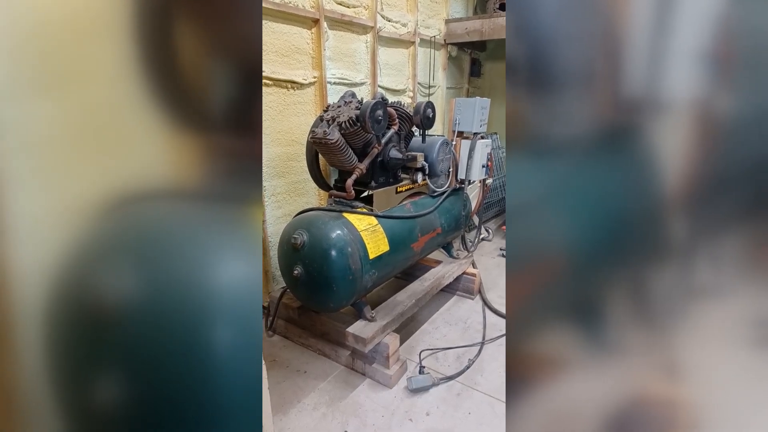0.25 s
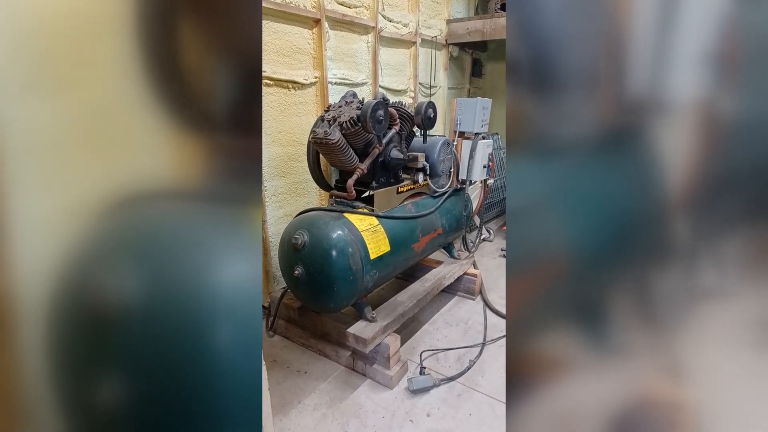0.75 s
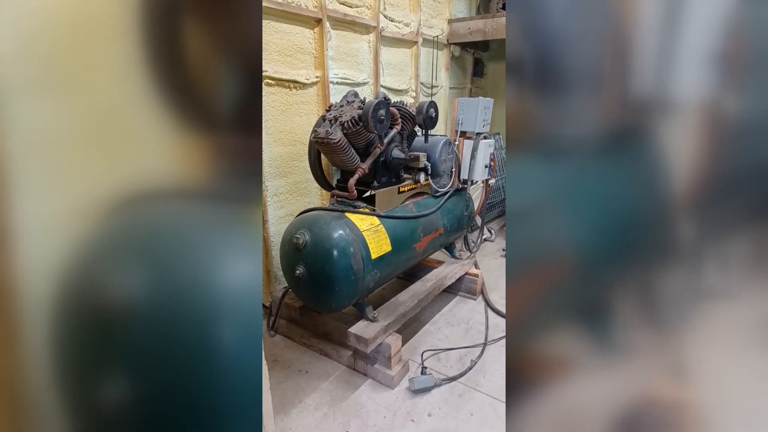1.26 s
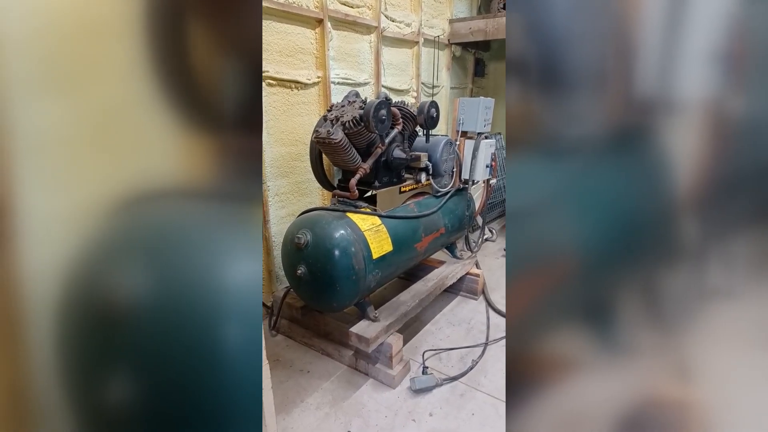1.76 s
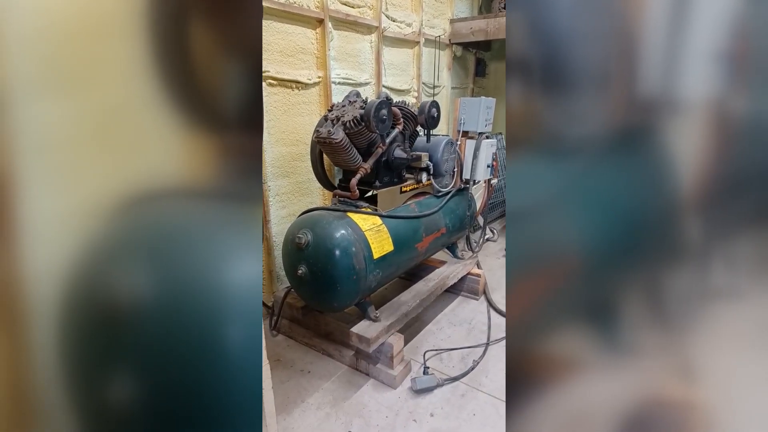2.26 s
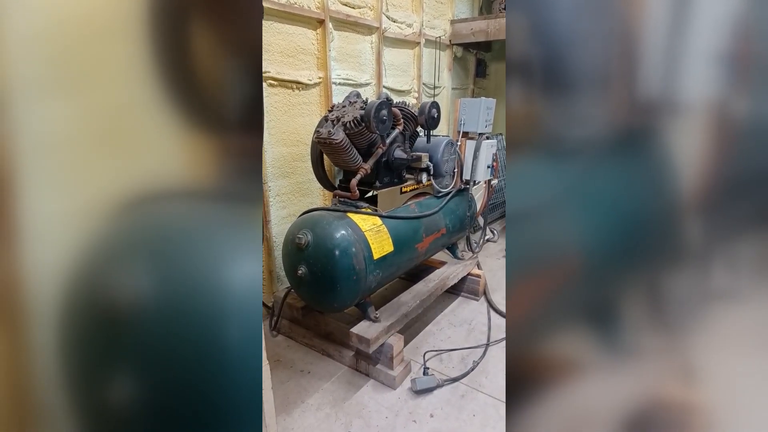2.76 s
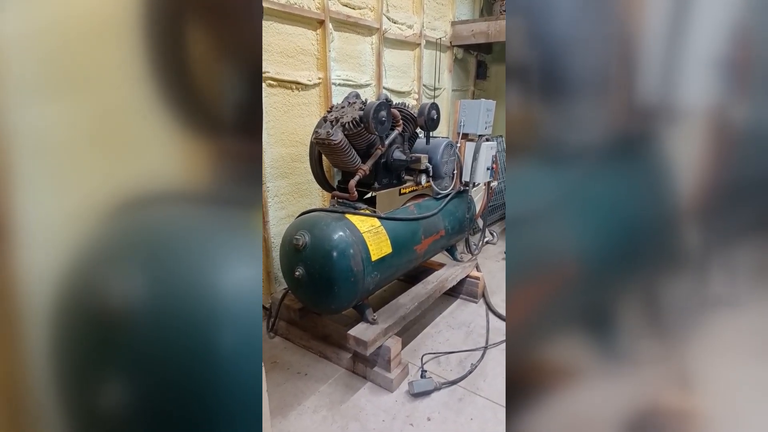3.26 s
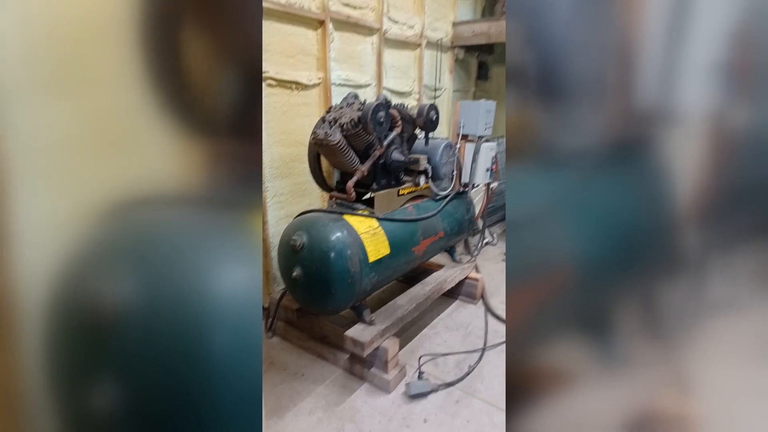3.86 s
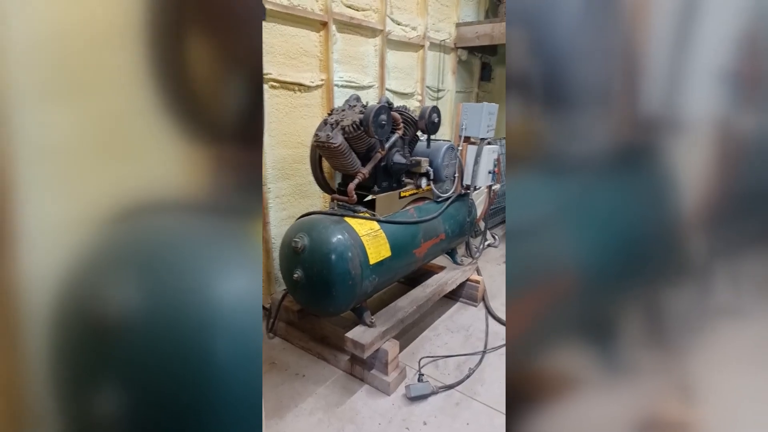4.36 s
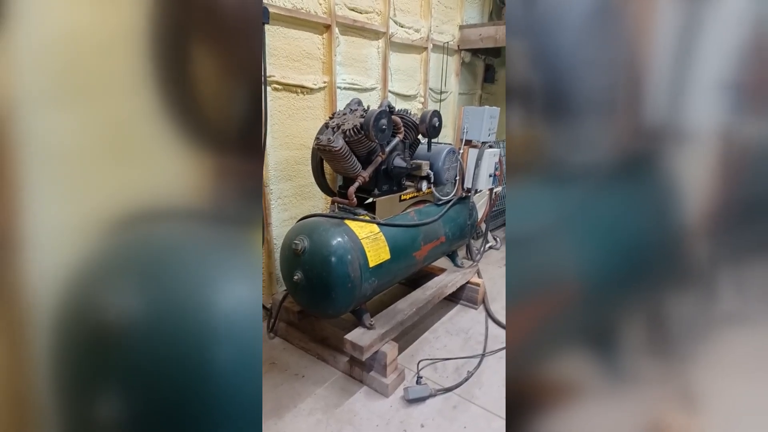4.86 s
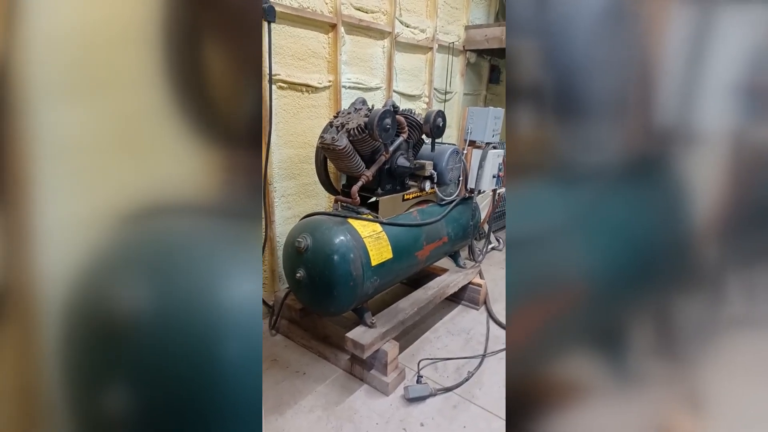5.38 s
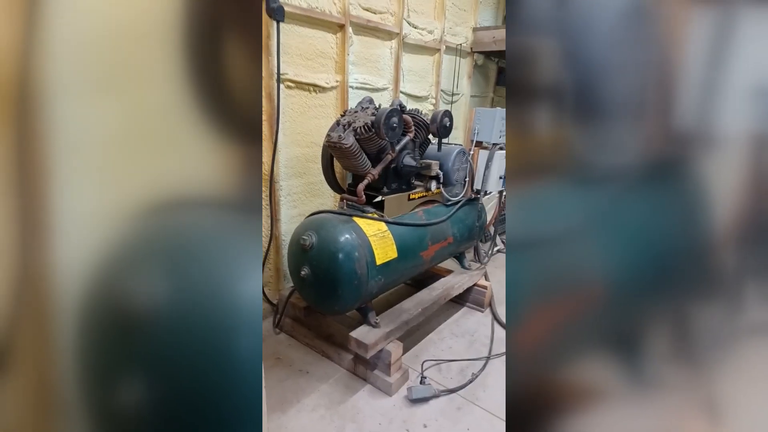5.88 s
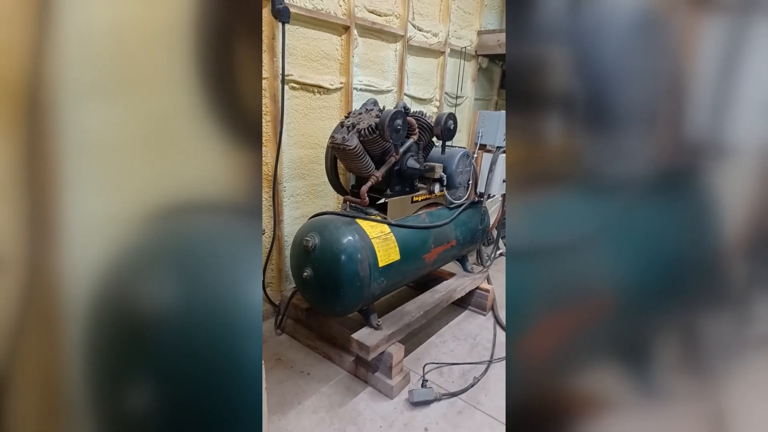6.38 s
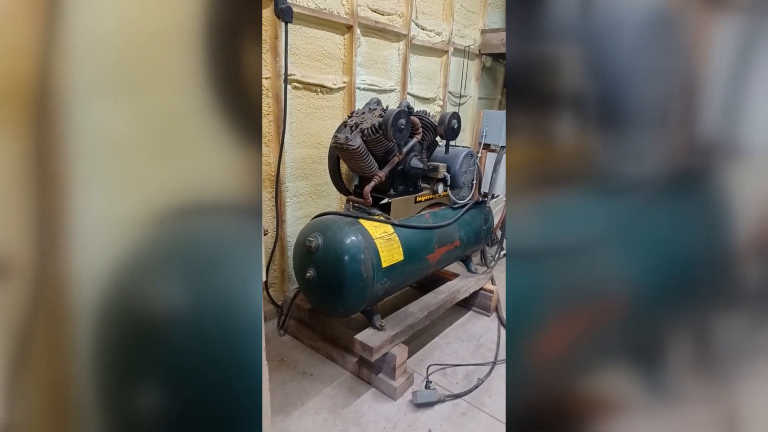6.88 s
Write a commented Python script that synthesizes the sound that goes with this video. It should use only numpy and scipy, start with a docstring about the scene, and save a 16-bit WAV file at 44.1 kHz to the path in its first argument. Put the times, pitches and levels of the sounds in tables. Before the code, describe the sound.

An electric air compressor runs without pause, its fast, regular chugging mixed with airy hiss, light metal clatter and a low hum.

```python
"""A belt-driven two-cylinder air compressor chugs steadily on its tank in a small workshop.
Every turn of the crank repeats the same puffs of air, which ring the tank and the room, and the same
valve gushes, rod knock and clatter, which ring the metalwork. The electric motor hums under the
pulsing load, over a bed of tank rumble and fan rush. Near walls echo the treble, which wavers as
the microphone moves."""
import sys
import numpy as np
from scipy import signal
from scipy.fft import rfft, irfft, next_fast_len
from scipy.io import wavfile

SR = 44100
rng = np.random.default_rng(int(sys.argv[2]) if len(sys.argv) > 2 else 0)


def wrap_up_sound(samples):
    """Save the sound to the file named by the first command line argument, as 16-bit audio."""
    columns = np.atleast_2d(samples).T
    # keep every value between -1 and 1, then stretch to whole-number steps
    tamed = np.clip(columns, -1, 1)
    steps = np.round(tamed * 32767).astype(np.int16)
    wavfile.write(sys.argv[1], SR, steps)


N = 314433
TIME = np.arange(N) / SR
TURNS_PER_S, SLOWING_PER_S = 9.5012, 0.00125   # the crank slows a little as the tank fills


# The chug, pressure puffs within one turn: start_s, level_db, pitch_hz, width_hz
AIR_PUFFS = [(0.0114, -41.0, 670, 198), (0.02, -24.8, 197, 68), (0.0336, -32.9, 242, 79),
             (0.0401, -41.9, 418, 96), (0.0477, -29.7, 127, 169), (0.0636, -29.3, 180, 129),
             (0.0891, -38.5, 355, 80), (0.0982, -23.0, 226, 99)]
# The boom of tank, pipes and room: pitch_hz, width_hz, gain_db
TANK_MODES = [(75.7, 15.4, 2.0), (97.7, 5.0, 8.4), (139.1, 20.7, -1.8), (147.9, 5.0, 12.3),
              (183.9, 5.0, 0.3), (221.0, 5.0, 2.8), (260.2, 5.0, 12.5), (306.1, 5.0, 15.0),
              (358.1, 5.6, 21.0), (377.8, 7.3, 21.8), (412.5, 8.6, 6.4), (477.7, 7.8, 15.3),
              (601.8, 7.5, 20.4), (653.8, 24.1, 7.3)]
def pumping(turns, wall_s=0.00617):
    """The puffs set tank and room ringing; a reflection from the side wall widens them."""
    puffs = strokes(turns, AIR_PUFFS, uneven_db=-0.28, loose_s=.00002)
    return widen_by_echo(ringing(puffs, TANK_MODES), wall_s)


# Each valve's hiss, by valve name: pitch_hz, width_hz, level_db, left_minus_right_db
HISS_BANDS = { "first outlet": [(6800, 510, -34.5, 1.5), (7540, 500, -36, 7.5), (10260, 490, -39.5, -2),
              (12800, 640, -33.5, -4), (13500, 2200, -30, -4)], "second outlet": [(1320, 870, -42, -7),
              (2230, 1230, -39, -1.5), (7490, 380, -39.5, 4.5), (13100, 880, -34.7, -7.5),
              (14500, 1100, -40, 4)], "first inlet": [(5690, 1070, -35.5, -2.5)],
              "second inlet": [(5950, 380, -41.5, 2), (7635, 560, -39, 8), (9550, 1000, -39, 1.5)]}
# Valve cues within one turn: valve, start_s, rise_s, hold_s, decay_s
VALVE_CUES = [("first outlet", 0.0956, .0013, .004, 0.014), ("second outlet", .018, .004, 0.014, .013),
              ("first inlet", 0.031, 0.0055, 0.011, .017), ("second inlet", 0.0675, .002, 0.0064, 0.012)]
def valves(turns, uneven_db=0.8, flutter_db=1.33):
    """Each valve opens at its crank angle and sings in bands of its own while the air passes."""
    out = np.zeros((2, N))
    for valve, start_s, rise_s, hold_s, decay_s in VALVE_CUES:
        open_s = (turns / TURNS_PER_S - start_s) % (1 / TURNS_PER_S)
        for hz, width_hz, db, pan_db in HISS_BANDS[valve]:
            late_s = 0.7 / width_hz   # a narrow band builds up and dies away later
            flow = gush(open_s, rise_s + late_s, hold_s + late_s, decay_s + late_s)
            level = from_db(db + uneven_db * drift(10) + flutter_db * drift(130))
            pan = from_db([[pan_db / 2], [-pan_db / 2]])
            out += jet(hz, width_hz) * flow * level * pan
    return out


def gush(open_s, rise_s, hold_s, decay_s):
    """Air flow through a valve rises, holds and dies away; its peak is 1."""
    flow = (1 - np.exp(-open_s / rise_s)) * np.exp(-np.maximum(open_s - hold_s, 0) / decay_s)
    return flow / flow.max()


def jet(hz, width_hz, direct_share=0.17, lag_s=.0003):
    """A band of air noise: the direct share arrives left just before right, the rest is diffuse."""
    noise = white((3, N))
    direct = np.array([noise[2], np.roll(noise[2], int(lag_s * SR))])
    air = np.sqrt(1 - direct_share) * noise[:2] + np.sqrt(direct_share) * direct
    edges_hz = np.clip([hz - width_hz / 2, hz + width_hz / 2], 50, .45 * SR)
    return signal.sosfilt(butter(2, edges_hz, "band"), air) / np.sqrt(width_hz)


# Wrist pin and rod knock at the top of the hard stroke, then rebound: start_s, level_db
ROD_HITS = [(.021, -40), (.025, -40), (.034, -48.5)]
# The rod's clank: pitch_hz, width_hz, gain_db
ROD_MODES = [(765, 350, -5), (1103, 260, -1.5), (1480, 420, -3), (2180, 550, -5.5)]
def rod_knock(turns, floor_s=0.00098):
    """Play in the rod is taken up once a turn, never quite alike; the floor reflects the knock."""
    swings = [(start_s, db + mode_db, hz, width_hz)
              for start_s, db in ROD_HITS for hz, width_hz, mode_db in ROD_MODES]
    knocks = strokes(turns, swings, uneven_db=2.0, loose_s=0.000718)
    return widen_by_echo(knocks, floor_s)


# The rattle of rods and bearings: pitch_hz, level_db_per_hz
CLATTER_EQ = [(300, -69.5), (550, -77), (800, -72), (950, -76), (1120, -66), (1500, -73.5), (2000, -77),
              (3500, -86.5), (7000, -100)]
def clatter(turns, swell_db=2.0):
    """The same dense small contacts come round with every turn, hardest under load."""
    turn_samples = int(SR / TURNS_PER_S)
    one_turn = white((2, turn_samples))
    contacts = one_turn[:, (turns % 1 * turn_samples).astype(int)]
    swell = from_db(swell_db * load(turns, peak_s=0.019))
    mid, side = colour(contacts * swell, CLATTER_EQ)
    return spread(mid, side)


# The ring of cylinder heads, cooling fins and pipes: pitch_hz, width_hz, gain_db
METAL_MODES = [(845, 17, -6.5), (1080, 31, -0.5), (1247, 16, -8), (1500, 43, 0), (2146, 35, -12),
               (6040, 100, -4.5), (6910, 106, -3.5), (7580, 78, -14), (10340, 180, -23), (12560, 130, -16)]
def metalwork(sound):
    """The metal parts ring along with the air and the contacts that excite them."""
    return ringing(sound, METAL_MODES)


# The motor's drone: pitch_hz, level_db
MOTOR_TONES = [(131.8, -52), (200.0, -47), (234.3, -50), (240.04, -24.3), (292.9, -44), (362.6, -49),
               (381.6, -48), (480.0, -46)]
def motor(turns, throb_db=2.5, lag_rad=0.18):
    """Magnetic hum and shaft tones swell and lag as the pistons load the motor."""
    strain = load(turns, peak_s=0.093)
    hum = sum(from_db(db) * np.sqrt(2) * np.sin(lag_rad * strain - 2 * np.pi * hz * TIME)
              for hz, db in MOTOR_TONES)
    return hum * from_db(throb_db * strain)


# The low bed of tank and belt: pitch_hz, level_db_per_hz
RUMBLE_EQ = [(20, -106), (42, -119), (62, -61), (110, -63), (132, -52), (165, -61), (205, -68),
             (250, -49.5), (325, -62), (380, -56.5), (470, -63), (620, -64), (900, -70.5), (2500, -88)]
def rumble():
    """Tank and belt shake irregularly, at a steady level."""
    mid, side = colour(white((2, N)), RUMBLE_EQ)
    return spread(mid, side)


# The airy bed of fan and flywheel: pitch_hz, level_db_per_hz
RUSH_EQ = [(200, -71), (700, -71), (1300, -67), (2000, -70), (3200, -72), (5000, -73.5), (6000, -73.5),
           (6450, -76), (7200, -71), (8500, -83.5), (10400, -76), (11300, -74), (12700, -69.5),
           (15700, -81.5)]
# Where that air sits in the stereo image: pitch_hz, left_minus_right_db
RUSH_PANNING = [(1000, 1.5), (2500, 0), (4500, -1.5), (8000, 5.5), (10000, 1), (12000, -6)]
def fan_rush(turns, swell_db=1.0):
    """Fan and flywheel spokes stir diffuse air noise that swells slightly once a turn."""
    air = colour(white((2, N)), RUSH_EQ)
    swell = from_db(swell_db * load(turns, peak_s=0.038))
    return tilt(air * swell, RUSH_PANNING)


def walls(pair, echo_db=-10.5, nearest_s=.0015, farthest_s=.007, sway_s=.0001, count=3):
    """Near walls and the tank echo the treble; the paths change slowly as the microphone moves."""
    treble = signal.sosfiltfilt(butter(2, 1800, "high"), pair)
    echoes = np.zeros((2, N))
    for side in range(2):
        for path_s in rng.uniform(nearest_s, farthest_s, count):
            heard_at = ((TIME - path_s - sway_s * drift(2)) * SR).astype(int)
            echoes[side] += from_db(echo_db) * treble[side].take(heard_at, mode="clip")
    return pair - treble + (treble + echoes) / np.sqrt(1 + count * from_db(echo_db) ** 2)


# The treble's fader ride, played about its average: time_s, level_db
TREBLE_RIDE = [(0.0, -29.5), (1.8, -31.5), (3.0, -33.5), (3.7, -37.4), (4.25, -35.8), (5.6, -34.7),
               (6.0, -37.6), (6.55, -36), (7.13, -38.8)]
# Moving EQ bands (a negative share swells as the treble dips): low_hz, high_hz, db_per_s, ride_share
MOVING_BANDS = [(105, 170, 0.26, -0.059), (330, 720, -0.02, -0.23), (950, 1300, -0.2, -0.27),
                (6550, 8000, 0.38, 0.3), (12000, 13200, 0.14, 0.15), (13340, 14000, 0, 1.1)]
def wavering_tone(sound):
    """The bass grows slowly fuller, other bands drift, and the treble wavers as the microphone moves."""
    ride_db = np.interp(TIME, *np.transpose(TREBLE_RIDE))
    for low_hz, high_hz, db_per_s, share in MOVING_BANDS:
        band = signal.sosfiltfilt(butter(4, [low_hz, high_hz], "band"), sound)
        change_db = db_per_s * (TIME - TIME.mean()) + share * (ride_db - ride_db.mean())
        sound = sound + band * (from_db(change_db) - 1)
    return sound


def load(turns, peak_s):
    """Compression load, -1 to 1, highest at peak_s into each turn."""
    return np.cos(2 * np.pi * (turns - peak_s * TURNS_PER_S))


def strokes(turns, swings, uneven_db, loose_s):
    """Short damped swings, each at its own point of every turn, with one second of pre-roll."""
    out = np.zeros(N + SR)
    for start_s, db, hz, width_hz in swings:
        start_turn = start_s * TURNS_PER_S
        due_turns = np.arange(-int(TURNS_PER_S), turns[-1] - start_turn) + start_turn
        due_s = np.interp(due_turns, np.r_[-TURNS_PER_S, turns], np.r_[-1, TIME])
        due_s = np.clip(due_s + loose_s * rng.standard_normal(len(due_s)), -1, TIME[-1])
        strength = from_db(db + uneven_db * rng.standard_normal(len(due_s)))
        clicks = np.zeros(N + SR)
        clicks[((due_s + 1) * SR).astype(int)] = strength * SR / width_hz
        out += resonate(resonate(clicks, hz, width_hz), hz, width_hz)
    return out


def ringing(x, modes):
    """A sound together with the resonances that it excites."""
    return x + sum(from_db(db) * resonate(x, hz, width_hz) for hz, width_hz, db in modes)


def resonate(x, hz, width_hz):
    """One resonance with gain 1 at its peak."""
    radius = np.exp(-np.pi * width_hz / SR)
    feedback = [1, -2 * radius * np.cos(2 * np.pi * hz / SR), radius ** 2]
    return signal.lfilter(np.array([1, 0, -1]) * (1 - radius ** 2) / 2, feedback, x)


# Stereo width, tight in the bass and open on top: pitch_hz, side_gain_db
WIDTH_EQ = [(60, -33), (170, -20.5), (240, -16.5), (380, -9), (600, -12), (1000, -6.5), (2000, 0.5)]
def spread(mid, side):
    """Two microphones hear the bass alike and the treble differently."""
    return mid + colour(side, WIDTH_EQ) * np.array([[1], [-1]])


def widen_by_echo(sound, delay_s):
    """One reflection feeds the stereo sides; the second of pre-roll is dropped."""
    echo = np.roll(sound, int(delay_s * SR))
    return spread(sound[SR:], echo[SR:])


def tilt(pair, curve):
    """Lean a stereo pair left or right by a (pitch_hz, left_minus_right_db) curve."""
    return np.array([colour(x, [(hz, sign * db / 2) for hz, db in curve])
                     for x, sign in zip(pair, (1, -1))])


def colour(x, curve):
    """EQ by a (pitch_hz, gain_db) curve on a log-frequency axis."""
    hz, db = np.transpose(curve)
    size = next_fast_len(N + 8192)
    bins_hz = np.maximum(np.arange(size // 2 + 1) * SR / size, 1)
    gain = from_db(np.interp(np.log(bins_hz), np.log(hz), db))
    return irfft(rfft(x, size) * gain, size)[..., :N]


def butter(order, hz, kind):
    """A filter with a flat passband."""
    return signal.butter(order, hz, kind, fs=SR, output="sos")


def white(shape):
    """Noise of 0 dB per Hz."""
    return rng.standard_normal(shape) * np.sqrt(SR / 2)


def drift(per_s):
    """A random wander with a spread near 1, gliding to per_s new values a second."""
    return np.interp(TIME * per_s, np.arange(1000), rng.standard_normal(1000))


def from_db(db):
    """Decibels to gain."""
    return 10 ** (np.asarray(db) / 20)


# Where the whole machine sits in the stereo image: pitch_hz, left_minus_right_db
MACHINE_PANNING = [(80, -1.3), (170, -0.5), (260, 2), (380, 1), (600, 1.5), (1100, -1.5), (1800, -1),
                   (3000, .5), (5000, -1)]
def scene(belt_slip_turns=0.00054):
    """One crank sets the rhythm of every pulsing layer; the belt lets it wander a little."""
    turns = np.cumsum(TURNS_PER_S - SLOWING_PER_S * TIME) / SR + belt_slip_turns * drift(6)
    bright = valves(turns) + rod_knock(turns) + clatter(turns) + fan_rush(turns)
    iron = walls(metalwork(bright))
    machine = pumping(turns) + rumble() + motor(turns) + iron
    return wavering_tone(tilt(machine, MACHINE_PANNING))


def record(dry, low_cut_hz=50, high_cut_hz=15750):
    """The microphone sheds the deepest bass; the top is cut steeply."""
    thin = signal.sosfilt(butter(6, low_cut_hz, "high"), dry)
    return signal.sosfilt(signal.ellip(12, .1, 80, high_cut_hz, fs=SR, output="sos"), thin)


dry = scene()
out = record(dry)
wrap_up_sound(out)
```